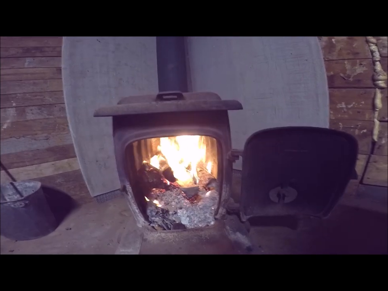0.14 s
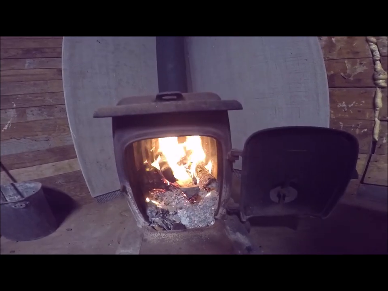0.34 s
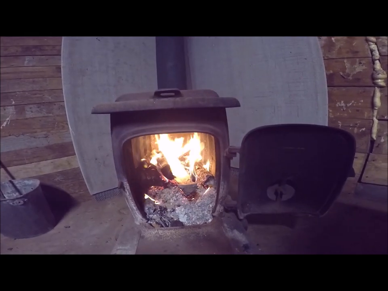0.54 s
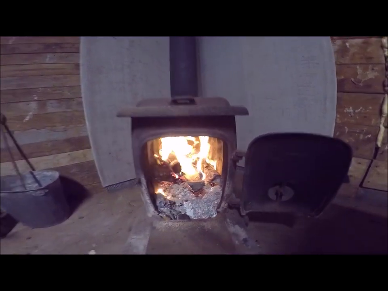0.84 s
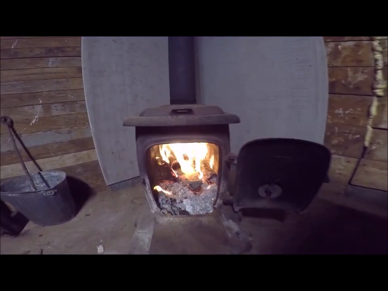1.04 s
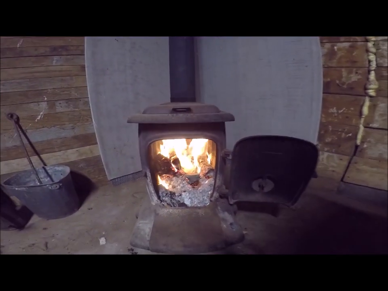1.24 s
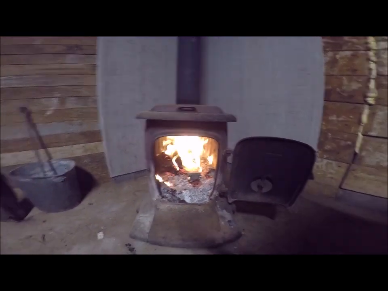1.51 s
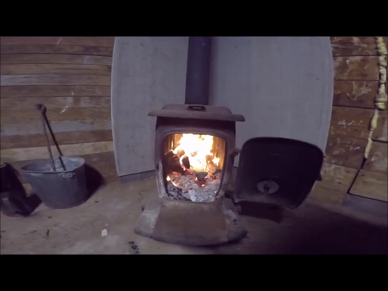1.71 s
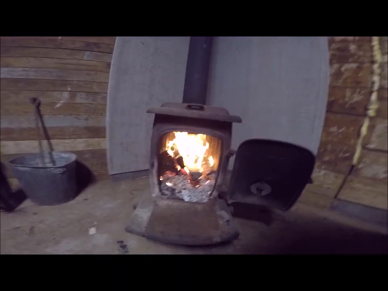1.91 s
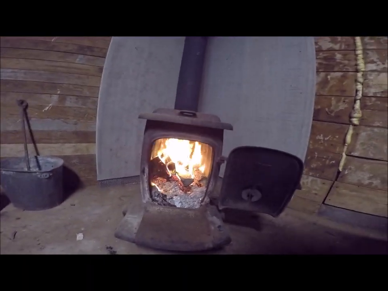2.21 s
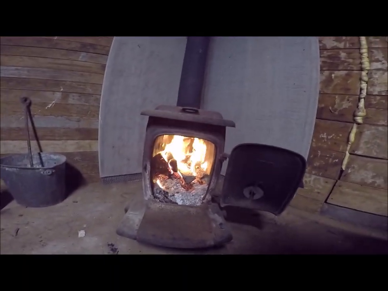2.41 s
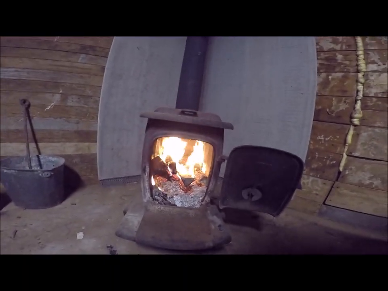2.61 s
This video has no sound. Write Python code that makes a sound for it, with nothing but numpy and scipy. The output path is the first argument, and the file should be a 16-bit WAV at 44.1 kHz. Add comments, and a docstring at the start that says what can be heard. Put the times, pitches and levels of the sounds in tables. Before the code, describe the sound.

Wood fire crackling softly in a stove inside a shed, interrupted by hard microphone bumps and rubbing

```python
"""A flue hums, embers hiss and logs pop: a wood fire in an open iron stove, inside a wooden shed.
The camera is carried backwards. Fingers bump its case, then rub hard across it in a loud rushing scrape;
air buffets the microphones, the grip rustles, a sleeve brushes past and the case ticks and clacks.
Fire and air are shaped noise, rubbing is trains of slips, and knocks and pops are short decaying bursts."""
import sys
import numpy as np
from scipy import signal
from scipy.fft import rfft, irfft
from scipy.io import wavfile
from scipy.ndimage import map_coordinates

SR = 44100
rng = np.random.default_rng(int(sys.argv[2]) if len(sys.argv) > 2 else 0)


def to_wav(sig):
    """Store sig (one row per channel, or 1-D mono) as 16-bit WAV at the path in sys.argv[1].

    Samples outside -1..1 are clipped; the rate is SR.
    """
    pcm = np.clip(np.atleast_2d(sig), -1, 1) * 32767
    pcm = np.round(pcm).astype(np.int16)
    wavfile.write(sys.argv[1], SR, pcm.T)  # frames by channels


N = 121275
TIME = np.arange(N) / SR

# In every table mid is what both microphones share, side is where they are opposed; positive pan is left.


def amp(db):
    """Decibels to gain."""
    return 10 ** (np.asarray(db) / 20)


def evened(x):
    """Scales to rms 1."""
    return x / np.sqrt(np.mean(x ** 2) + 1e-20)


def unit(x):
    """Scales to energy 1."""
    return x / np.sqrt(np.sum(x ** 2) + 1e-20)


def read(points, hz):
    """Reads a spectrum on a log-frequency axis."""
    f, value = np.transpose(points)
    return np.interp(np.log(hz + 1e-6), np.log(f), value)


def curve(rows, order=1):
    """One column of a control table at every sample."""
    rows = np.array(rows)
    return np.interp(TIME, rows[:, 0], rows[:, order])


def add(mix, s, sound):
    """Mixes a stereo sound in at time s."""
    part = mix[:, max(round(s * SR), 0):][:, :sound.shape[1]]
    part += sound[:, :part.shape[1]]


def ears(mid, side, pan_db=0):
    """Left and right from the shared and opposed parts."""
    left, right = amp(pan_db / 2), amp(-pan_db / 2)
    both = np.array([(mid + side) * left, (mid - side) * right])
    return both / np.sqrt((left ** 2 + right ** 2) / 2)


def colour(x, points, size=4096):
    """Causal minimum-phase filter with the given spectrum."""
    log_gain = np.log(amp(read(points, abs(np.fft.fftfreq(size, 1 / SR)))))
    taps = np.fft.ifft(np.exp(np.conj(signal.hilbert(log_gain)))).real[:size // 2]
    return signal.fftconvolve(x, taps)[:len(x)]


def band(x, hz, kind):
    """Steep filter."""
    return signal.sosfilt(signal.butter(4, hz, kind, fs=SR, output="sos"), x)


def noise(points):
    """Steady noise with the given spectrum, at rms 1."""
    spectrum = rfft(rng.standard_normal(N))
    return evened(irfft(spectrum * amp(read(points, np.fft.rfftfreq(N, 1 / SR))), N))


def resonate(x, hz, pole_width_hz):
    """A steep-sided resonance: the same pole twice over."""
    r = np.exp(-np.pi * pole_width_hz / SR)
    pole = [1, -r * np.exp(2j * np.pi * hz / SR)]
    once = signal.lfilter([1 - r], pole, x)
    return evened(signal.lfilter([1 - r], pole, once).real)


def slips(per_s, spread_db, hiss=1.0):
    """Friction: a dense train of uneven slips over hiss."""
    size = amp(spread_db * np.minimum(rng.exponential(1, N), 4)) * rng.choice([-1, 1], N)
    return evened(size * (rng.random(N) < per_s / SR)) + hiss * rng.standard_normal(N)


def gate(start, end, edge_s):
    """Rises, holds and falls."""
    return np.clip(np.minimum(TIME - start, end - TIME) / edge_s + .5, 0, 1)


def waver(x, pitch=1):
    """Moves all resonances together, by a pitch curve and a random wobble."""
    wobble = np.interp(TIME / .02, np.arange(N), rng.standard_normal(N))  # a new value every 20 ms
    position = np.cumsum(pitch * (1 + .035 * wobble))
    return map_coordinates(x, [position], order=5, mode="mirror")


# Spectra of the fire at the microphones: pitch_hz, level_db per Hz
FIRE_MID = [(25, -15), (90, -23.5), (170, 3.5), (300, -5.5), (700, -21), (4300, -34), (7000, -31.5),
            (10000, -32.5), (15000, -50.5)]
FIRE_SIDE = [(25, -20), (100, -3.5), (300, -9.5), (1200, -23.5), (4000, -42.5), (8000, -34.5), (15000, -53)]
# Level of the fire's noise bed, which dips while the finger rubs and stays lower after: time_s, level_db
HISS = [(1.25, 7.5), (2.05, -8), (2.6, -7)]
# Hum of the flue: time_s, level_db
FLUE = [(0.03, -39), (0.3, -53.5), (0.9, -44.5)]
FIRE_DB = -53  # base level, before the HISS curve is applied
FLUE_HZ, FLUE_POLE_WIDTH_HZ = 166.6, 41.4
CRACKLE_PER_S, CRACKLE_GAIN_DB = 18, -41.5


def fire():
    """The draught hums in the flue; flames and embers hiss and tick faintly."""
    bed = amp(FIRE_DB) * ears(noise(FIRE_MID), noise(FIRE_SIDE))
    hum = amp(curve(FLUE)) * resonate(rng.standard_normal(N), FLUE_HZ, FLUE_POLE_WIDTH_HZ)
    sparks = rng.standard_normal(N) * (rng.random(N) < CRACKLE_PER_S / SR)
    crackle = amp(CRACKLE_GAIN_DB) * colour(sparks, POP_COLOUR)
    return bed * amp(curve(HISS)) + ears(hum, 0.081 * hum) + crackle


# Reverberation of the shed: pitch_hz, t60_s
SHED = [(150, 0.22), (1000, 0.38), (8000, 0.17), (15000, 0.14)]


def shed(x):
    """A short diffuse tail from the plank walls, each pitch dying at its own rate."""
    hz, t, z = signal.stft(rng.standard_normal((2, SR // 2)), SR, nperseg=256)
    decay = amp(-60 * t / read(SHED, hz)[:, None])
    tail = signal.istft(z * decay, SR, nperseg=256)[1]
    return signal.fftconvolve(x, tail / np.linalg.norm(tail[0]), axes=1)[:, :N]


# Pops of the logs: start_s, level_db, ring_hz, ring_db, pan_db, room_db over the direct sound
POPS = [(0.001, -14.5, 3360, -0.5, -1, 12), (0.489, -10, 3370, -3, -1.5, -12),
        (0.9269, 1.5, 2130, -40, 0.5, -9.5), (1.3298, -4, 7060, -10, -3, -2)]
# Filter of pops and crackle: pitch_hz, gain_db
POP_COLOUR = [(60, -23), (170, -1), (2200, -4.5), (4500, 0), (7000, 2.5), (9000, -2), (11500, -9),
              (14500, -14), (16500, -27)]
# The snap and its echoes inside the firebox: delay_s, gain
FIREBOX = [(0, 1), (.0014, 0.79), (.0057, 0.16)]
POP_DECAY_S, RING_DECAY_S = 0.0055, .0012
SPLINTER_DB = 2  # over the snap


def pops():
    """A pocket of steam cracks a log: a snap, splinters, echoes in the firebox, then the shed."""
    direct, sent, t = np.zeros((2, N)), np.zeros((2, N)), np.arange(SR // 16) / SR
    for s, db, ring_hz, ring_db, pan_db, room_db in POPS:
        hiss = rng.standard_normal((2, len(t))) * np.exp(-t / POP_DECAY_S)
        mid, side = (amp(SPLINTER_DB) * unit(z) for z in hiss)
        for delay, gain in FIREBOX:
            mid[round(delay * SR)] += gain
        ring = amp(ring_db) * unit(np.sin(2 * np.pi * ring_hz * t) * np.exp(-t / RING_DECAY_S))
        shared = unit(colour(mid, POP_COLOUR)) + ring
        pop = amp(db) * ears(shared, .5 * unit(colour(side, POP_COLOUR)), pan_db)
        pop /= np.hypot(1, amp(room_db))  # near and far sound share the energy
        add(direct, s, pop)
        add(sent, s, pop * amp(room_db))
    return direct + shed(sent)


# Air and grip while walking back: time_s, rumble_db, rustle_db
CARRY = [(1.15, -56.5, -63.5), (1.5, -29.5, -45), (1.8, -36.5, -43), (1.98, -37, -46.5), (2.07, -37, -49.5),
         (2.25, -31.5, -42.5), (2.38, -39, -49.5), (2.51, -27, -36.5), (2.62, -36.5, -44.5)]
# Spectrum of the air: pitch_hz, level_db
RUMBLE = [(12, -1.5), (28, 4.5), (70, -2.5), (200, -20.5), (1000, -93)]


def buffeting():
    """Air buffets the moving microphones: deep noise, partly different in each."""
    return ears(noise(RUMBLE), 0.47 * noise(RUMBLE)) * amp(curve(CARRY))


# Filter of the rustle: pitch_hz, gain_db
RUSTLE = [(80, -4), (230, 3.5), (1300, -12.5), (3000, -21), (4400, -17.5), (5800, -18), (7500, -24.5),
          (12000, -30)]
# Further filter of its opposed part: pitch_hz, gain_db
RUSTLE_SIDE = [(200, 4), (600, 5.5), (1400, 7), (2400, 3.5), (4000, -11), (8000, -5)]
# Opposed part of the rustle: the stereo image narrows towards the end: time_s, gain_db
RUSTLE_WIDTH = [(1.9, 2), (2.45, -18)]


def rustling():
    """The grip rustles on the case: small wavering slips."""
    mid, side = (evened(waver(colour(slips(700, 0.71), RUSTLE))) for _ in range(2))
    side = colour(side, RUSTLE_SIDE) * amp(curve(RUSTLE_WIDTH))
    return ears(mid, side) * amp(curve(CARRY, order=2))


# Finger bumps on the case: start_s, level_db, treble_db, shared_db, pan_db, pitch_ratio
BUMPS = [(0.198, -0.5, -11, -9, 0, 1.4), (0.7652, 4, -0.5, -2.5, -5, 1.09),
         (0.841, -4.5, -5, -1.5, -0.5, 0.87), (1.198, 6.5, -1, -8.5, 0.5, 1.02),
         (1.261, 13.5, -2, -7, -1, 0.86), (1.374, 14, -3, -1, -13.5, 1), (1.522, 13.5, 4, -4, -9.5, 1.06),
         (2.277, -0.5, -23, 4.5, -4, 1.155)]
# Modes of the case under a bump: pitch_hz, level_db, t60_s
BUMP_MODES = [(165, 7.5, 0.079), (221.7, 7.5, 0.05), (332, 0.5, 0.041), (447, -3, 0.015), (660, -7, 0.018),
              (782, -1, 0.039), (1350, -14, 0.028)]
BUMP_CORNER_HZ = 500  # treble_db applies to the modes above this
DETUNE = 0.048  # random spread of each mode, as a share of its pitch


def knock(treble_db, pitch):
    """The modes of the case, slightly detuned, start together and die away."""
    t = np.arange(SR // 8) / SR
    out = np.zeros(len(t))
    for k, (hz, mode_db, t60) in enumerate(BUMP_MODES):
        detuned_hz = hz * pitch * (1 + DETUNE * rng.standard_normal())
        level = amp(mode_db + treble_db * (hz > BUMP_CORNER_HZ) - 60 * t / t60)
        out += level * np.sin(2 * np.pi * detuned_hz * t) * (-1) ** k
    return unit(out)


def bumps():
    """A finger knocks the case, which pushes the two microphones in opposite directions."""
    out = np.zeros((2, N))
    for s, db, treble_db, shared_db, pan_db, pitch in BUMPS:
        side, mid = knock(treble_db, pitch), knock(treble_db, pitch)
        add(out, s, amp(db) * ears(amp(shared_db) * mid, side, pan_db))
    return out


# Sleeve brushes: start_s, length_s, level_db
BRUSHES = [(0.768, 0.2, -56), (2.273, 0.016, -34), (2.458, 0.065, -35.5)]
# Filter of the cloth: pitch_hz, gain_db
BRUSH_COLOUR = [(80, -34), (250, 7.5), (1400, -4), (2100, 1), (3400, -10.5), (5300, -1), (7000, -16),
                (14000, -30.5)]
BRUSH_EDGE_SHARE = 0.47  # rise and fall, as a share of the length


def sleeve():
    """A sleeve brushes past: filtered slips, alike in both microphones."""
    cloth = evened(colour(slips(887, 1.7), BRUSH_COLOUR))
    level = sum(amp(db) * gate(s, s + length, BRUSH_EDGE_SHARE * length) for s, length, db in BRUSHES)
    return ears(cloth, 0) * level


CASE_RING_S, CASE_RING_DB = 0.0097, -3.5


def case_ring(x):
    """The many close modes of the plastic case ring briefly after every slip."""
    t = np.arange(SR // 16) / SR
    tail = unit(rng.standard_normal(len(t)) * np.exp(-t / CASE_RING_S))
    return x + amp(CASE_RING_DB) * signal.fftconvolve(x, tail)[:N]


def ring_out(level, ring_s):
    """A level that follows rises at once and dies away after falls."""
    fall = TIME / ring_s
    return np.exp(np.maximum.accumulate(np.log(level + 1e-9) + fall) - fall)


# Drags of the finger, which catches and slides on:
# start_s, end_s, bass_db, middle_db, treble_db, opposed_db, bass_pan_db
DRAGS = [(1.261, 1.269, -23.5, -42.5, -43, 3, 3), (1.268, 1.304, -29, -53, -48.5, 5.5, -1),
         (1.292, 1.394, -25, -35.5, -40.5, 6, -5.5), (1.394, 1.481, -22.5, -40, -49, 3, -10),
         (1.514, 1.582, -23, -32, -38.5, 3.5, -13), (1.582, 1.625, -23, -31, -33, 2.5, 1.5),
         (1.622, 1.693, -21.5, -41, -40.5, -1, 6), (1.676, 1.698, -18, -32, -33, -0.5, 5),
         (1.692, 1.766, -36, -43, -40, -2.5, 10), (1.848, 2.03, -36, -60, -63, 0, -5)]
# Filter of the rub: pitch_hz, gain_db
RUB_MID = [(24, -64), (50, -6), (115, -7.5), (176, 1), (373, -15.5), (849, -16), (1300, -19.5),
           (2440, -29.5), (3320, -25), (4200, -35.5), (7210, -33), (11000, -49), (14300, -70)]
# Opposed part of the rub over the shared part: pitch_hz, gain_db
RUB_SIDE = [(60, 4), (200, 0), (700, 9), (1350, 8), (2300, -1.5), (4300, -10), (7500, -1)]
# The rasp sinks as the finger slows: time_s, pitch_ratio
SLOWING = [(1.6, 1), (1.68, 0.95)]
SLIPS_PER_S, SLIP_SPREAD_DB = 1800, 2
JUDDER_DB, JUDDER_S = 1.5, 0.0086  # random spread of the level, and time between its values
BASS_TOP_HZ, TREBLE_HZ = 386, 2250
DRAG_EDGE_S, BASS_RING_S, RASP_RING_S = 0.0094, 0.014, .003


def rub():
    """A finger drags over the case in jerks: slips shake it in the bass, rasp in the middle and hiss on top."""
    steps = np.arange(0, N / SR, JUDDER_S)
    judder = amp(JUDDER_DB * np.interp(TIME, steps, rng.standard_normal(len(steps))))
    mid, side = (colour(case_ring(slips(SLIPS_PER_S, SLIP_SPREAD_DB)) * judder, RUB_MID) for _ in range(2))
    side = colour(side, RUB_SIDE)
    # opposed part and pan glide between the middles of the drags
    opposed = amp(curve([((row[0] + row[1]) / 2, row[-2]) for row in DRAGS]))
    pan_db = curve([((row[0] + row[1]) / 2, row[-1]) for row in DRAGS])
    mid, side = waver(mid, curve(SLOWING)), waver(side, curve(SLOWING)) * opposed
    bands = [(BASS_TOP_HZ, "low", BASS_RING_S, pan_db),
             ([BASS_TOP_HZ, TREBLE_HZ], "band", BASS_RING_S, 0),
             (TREBLE_HZ, "high", RASP_RING_S, 0)]
    out = np.zeros((2, N))
    for k, (hz, kind, ring_s, lean_db) in enumerate(bands):
        drags = [amp(row[2 + k]) * gate(row[0], row[1], DRAG_EDGE_S) for row in DRAGS]
        level = ring_out(np.max(drags, axis=0), ring_s)
        shared = band(mid, hz, kind)
        out += ears(shared, band(side, hz, kind), lean_db) / shared.std() * level
    return out


# Resonances of the case that the finger sets off:
# start_s, end_s, pitch_hz, half_pole_width_hz, level_db, opposed_share (0-1)
SQUEAKS = [(1.29, 1.383, 2680, 130, -37, 0.54), (1.49, 1.78, 1490, 152, -33.5, 0.78),
           (1.288, 1.362, 845, 39, -34, 0.39), (1.66, 1.732, 3290, 510, -28.5, 0.42),
           (2.27, 2.31, 1800, 120, -48, 0.78)]


def squeaks():
    """The dragging finger excites narrow resonances of the case."""
    out = np.zeros((2, N))
    for start, end, hz, half_width_hz, db, opposed in SQUEAKS:
        friction = slips(SLIPS_PER_S, SLIP_SPREAD_DB)
        ring = amp(db) * gate(start, end, 0.0034) * resonate(friction, hz, 2 * half_width_hz)
        shared = np.roll(ring, round(SR / hz / 4))  # a quarter cycle late
        out += ears((1 - opposed) * shared, opposed * ring) / np.hypot(opposed, 1 - opposed)
    return out


# Ticks of the case: start_s, level_db, pitch_hz
TICKS = [(1.3692, -10, 2730), (2.070, -20, 780), (2.095, -26, 1450), (2.2799, -16, 1910), (2.509, -8, 1360),
         (2.5173, -7, 1340), (2.5444, -3, 1000), (2.595, -9.5, 604), (2.649, -14.5, 6340),
         (2.718, -22, 1350), (2.741, -16, 1480)]
# Filter of a tick: multiple of its pitch, gain_db
TICK_SHAPE = [(.1, -3.5), (1, 9.5), (1.6, -1), (3, -19), (6, -17), (12, -39)]
TICK_DECAY_S, TICK_ROOM_DB = 0.0021, -36.0


def ticks():
    """Small dry clicks of the plastic case, with a trace of the shed."""
    out, t = np.zeros((2, N)), np.arange(SR // 20) / SR
    for s, db, hz in TICKS:
        snap = unit(rng.standard_normal(len(t)) * np.exp(-t / TICK_DECAY_S)) + 0.85 * (t == 0)
        tick = amp(db) * unit(colour(snap, [(k * hz, shape_db) for k, shape_db in TICK_SHAPE]))
        add(out, s, ears(tick, 0))
    return out + amp(TICK_ROOM_DB) * shed(out)


# Sharp clacks as the case flexes: start_s, level_db, pitch_hz
CLACKS = [(1.3706, 9.5, 1220), (1.3735, 15, 885), (1.5516, 9, 900), (1.616, -1, 1100)]
CLACK_DECAY_S = 0.00036


def clacks():
    """The case gives way: a brief hard swing, opposed in the two microphones."""
    out, t = np.zeros((2, N)), np.arange(SR // 50) / SR
    for s, db, hz in CLACKS:
        clack = amp(db) * unit(np.sin(2 * np.pi * hz * t) * t * np.exp(-t / CLACK_DECAY_S))
        add(out, s, ears(0.16 * clack, clack))
    return out


HANDLING_TOP_HZ = 10800


def scene():
    """The fire, and the handling of the camera, heard with its highest treble cut away above about 11 kHz."""
    air_and_cloth = buffeting() + rustling() + sleeve()
    handling = air_and_cloth + bumps() + rub() + squeaks() + ticks() + clacks()
    return fire() + pops() + band(handling, HANDLING_TOP_HZ, "low")


EDGE_HZ = 16300


def record(dry):
    """The microphone channel: overload on the highest peaks, then the band limit."""
    limit = signal.firwin(511, EDGE_HZ, window=("kaiser", 9), fs=SR)
    return signal.oaconvolve(np.clip(dry, -1, 1), limit[None], "same")


dry = scene()
out = record(dry)
to_wav(out)
```